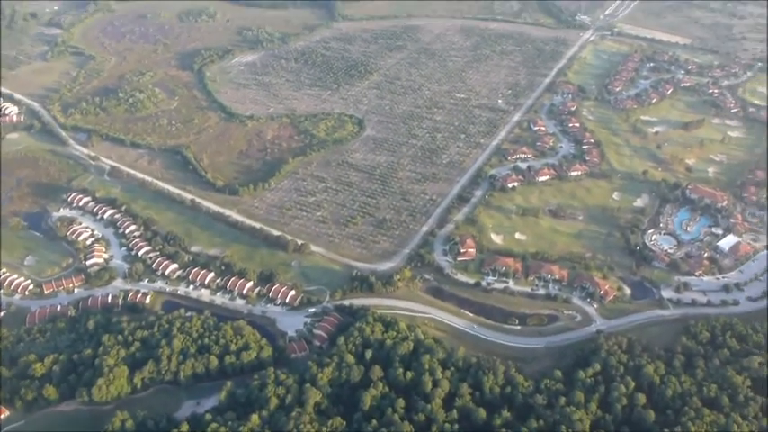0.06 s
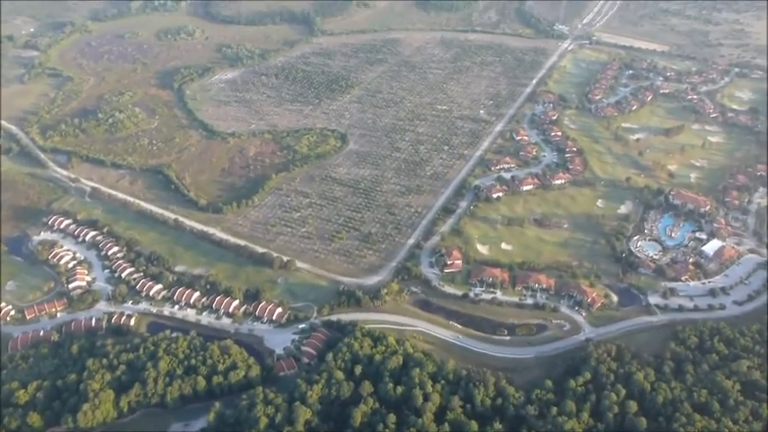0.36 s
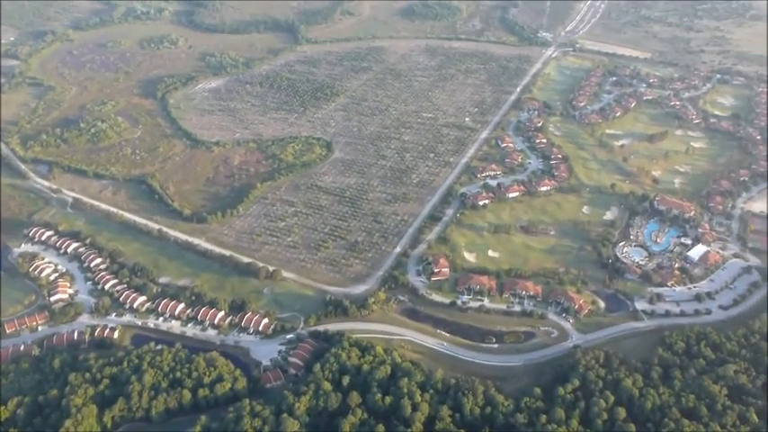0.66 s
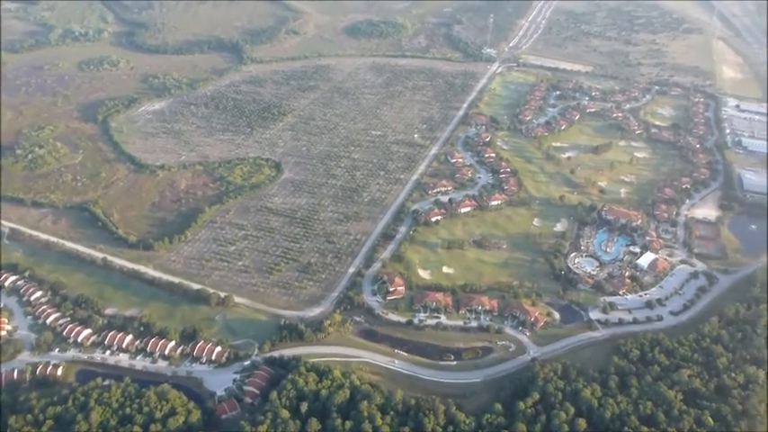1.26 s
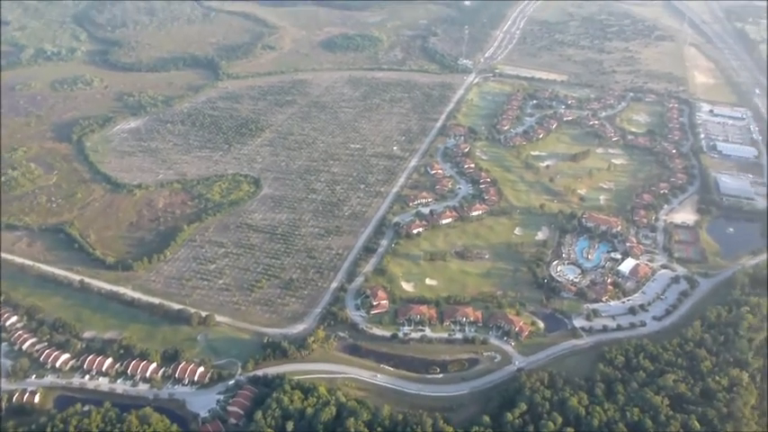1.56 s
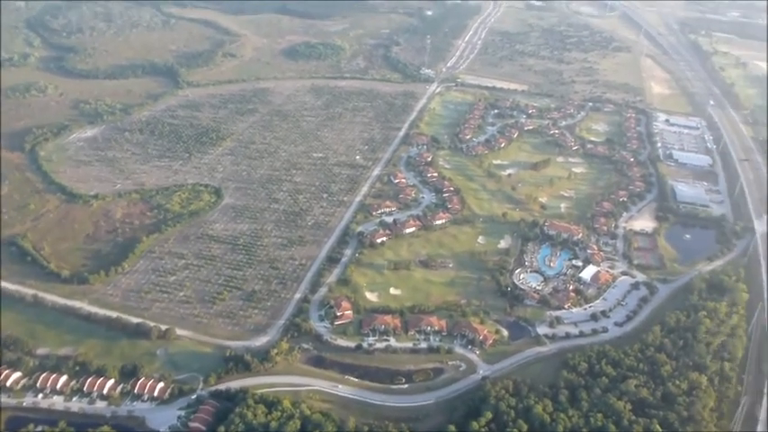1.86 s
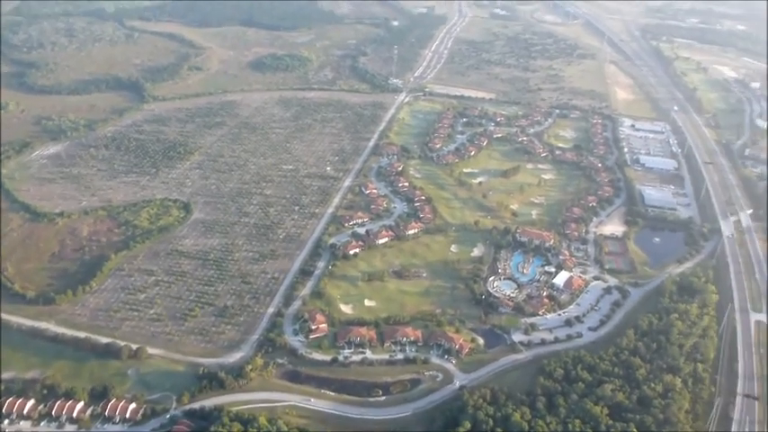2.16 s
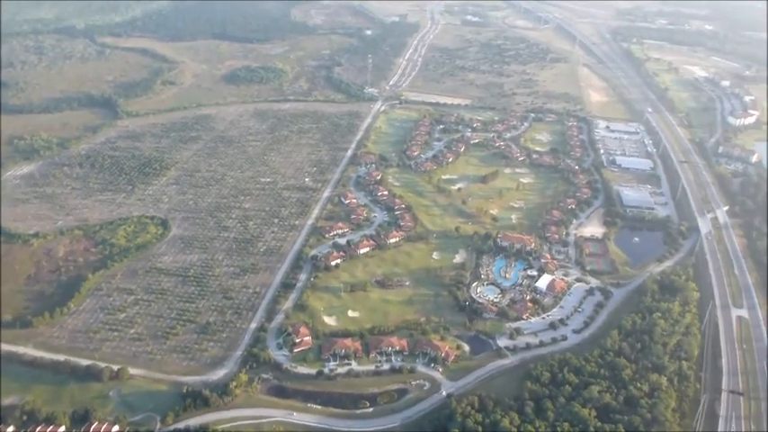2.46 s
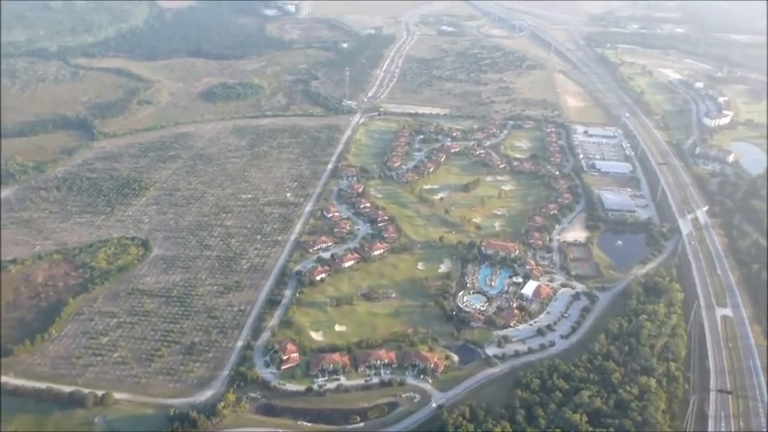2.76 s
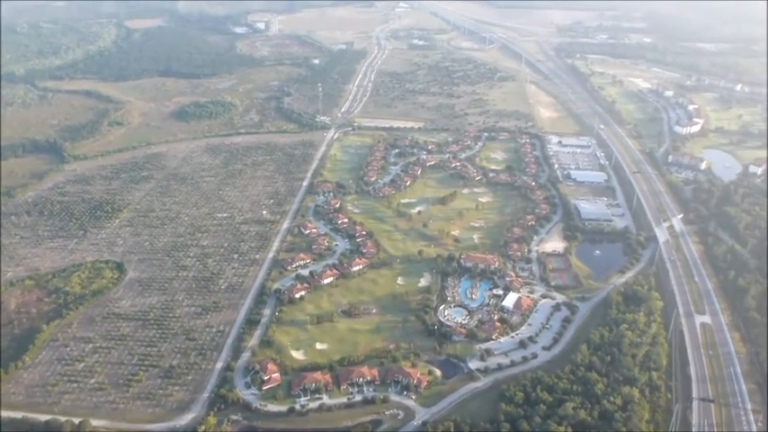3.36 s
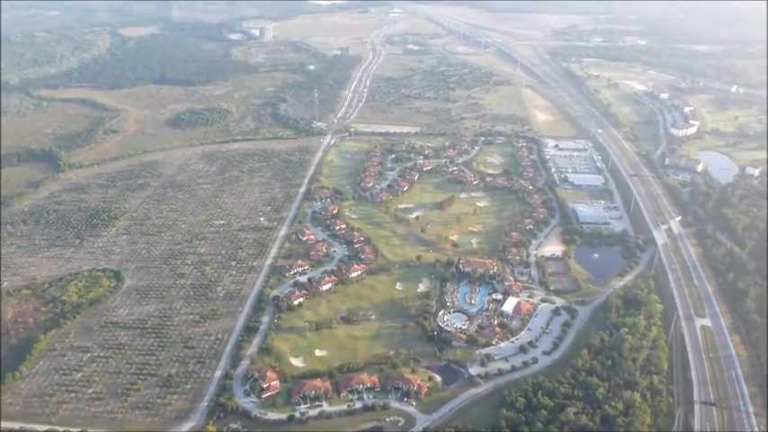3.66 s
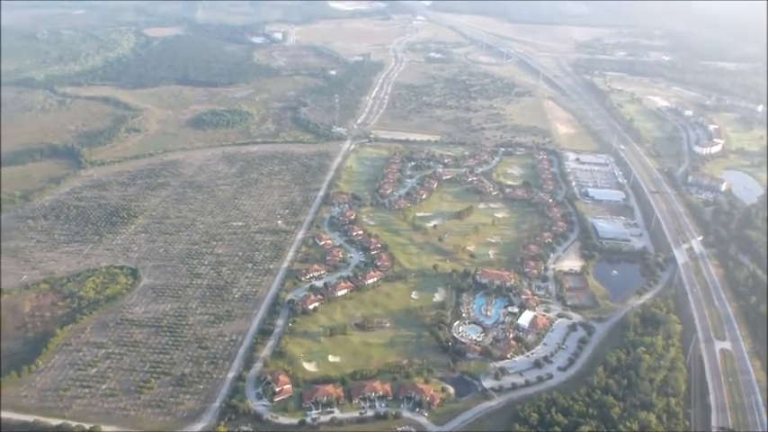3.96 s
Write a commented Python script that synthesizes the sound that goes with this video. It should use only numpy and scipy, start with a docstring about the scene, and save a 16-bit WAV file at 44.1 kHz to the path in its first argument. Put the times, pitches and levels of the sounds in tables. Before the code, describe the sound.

A hot air balloon burner roars and hisses, then shuts off to quiet open air.

```python
"""A propane burner roars just above a hot-air balloon basket, until its valve shuts.
Turbulent combustion rumbles and crackles over the hiss of the gas jets; roar and hiss dull as they
die away, and the last gas sighs out. The steady open-air background then grows louder as the
recorder's gain recovers. Faint whistles and a far hum come and go, small gusts buffet the
microphone and a hard fitting ticks in its damped modes."""
import sys
import numpy as np
from scipy import signal
from scipy.fft import rfft, irfft
from scipy.io import wavfile
from scipy.ndimage import uniform_filter1d

SR = 44100
rng = np.random.default_rng(int(sys.argv[2]) if len(sys.argv) > 2 else 0)


def inscribe(sig):
    """Save sig as 16-bit PCM at rate SR to the path in sys.argv[1].

    A 1-D sig is mono; a 2-D sig holds one channel per row.
    Samples are clipped to [-1, 1] before scaling.
    """
    pcm = np.round(np.clip(np.atleast_2d(sig).T, -1, 1) * 32767)
    wavfile.write(sys.argv[1], SR, pcm.astype(np.int16))


N = 176400

# strength of the burn with the valve open (time [s], flame level [dB], jet level [dB])
BURN_LEVEL = [(0, -19.5, -37), (.6, -20.5, -37), (.9, -19.5, -35.5), (1.18, -20, -36.5), (1.4, -19, -35.5),
              (1.9, -20, -35), (2.17, -20, -37.5), (2.24, -20.5, -40)]
# decay of the flame after the valve shuts (time [s], level [dB])
FLAME_DECAY = [(2.24, 0), (2.305, -1.5), (2.355, -8.5), (2.40, -18.5), (2.44, -39), (2.52, -60)]
# roar of the flame (frequency [Hz], spectral density [dB])
FLAME_SPECTRUM = [(10, -45), (22, -32), (36, -21), (50, -7.5), (80, -11.5), (105, -15), (125, -4),
                  (200, -4), (260, -1), (345, 0.5), (420, -3), (455, -5.5), (490, -4.5), (620, -12),
                  (710, -10.5), (1000, -18.5), (1350, -20), (1700, -22.5), (2200, -32.5), (3000, -50),
                  (6000, -73)]
# balance of the roar (frequency [Hz], left minus right [dB])
FLAME_PAN = [(100, -.5), (350, -1), (700, -2.5), (1400, -3.6), (2200, -7)]
# hiss at the two microphone ports
# (frequency [Hz], left density [dB], right density [dB], coherence [0-1], left phase lead [rad])
JET_SPECTRUM = [(2260, -9, -2, 0.57, -1.1), (3000, -7, 0.5, 0.73, -0.6), (3700, -7, -1, 0.75, -1.55),
                (4450, -7.5, 1, 0.6, -2.5), (5150, -10.5, 0.5, 0.3, -2.5), (5650, -13.5, 0.5, 0.58, -1.5),
                (6430, -7, 0, 0.56, -2.5), (7100, -15, 1, 0.1, -3.1), (7500, -9, -1, 0.53, -1.5),
                (8250, -8, -0.5, 0.39, -2.0), (8850, -10, 0.5, 0.49, -1.9), (9900, -6.5, -1.5, 0.7, -1.5),
                (11200, -2.5, -1.5, 0.7, -1.96), (12800, -2.5, -1, 0.68, -2.5), (14200, -1, -1, 0.73, -2.5),
                (15600, -7, -7, 0.7, -2.5)]
# decay of the hiss as the pressure falls (time [s], level [dB])
JET_DECAY = [(2.24, -0.5), (2.30, -2.5), (2.35, -10.5), (2.41, -22), (2.47, -31), (2.56, -53)]
# last gas leaving the nozzles (frequency [Hz], spectral density [dB])
SIGH_SPECTRUM = [(1500, -17), (2400, -7), (3100, -2), (4000, -2), (4800, 1), (5600, -6), (6600, -3),
                 (8000, -18), (9500, -10), (10500, -24.5), (15000, -34)]
# envelope of that sigh (time [s], level [dB])
SIGH_ENVELOPE = [(2.2, -80), (2.29, -47), (2.35, -47), (2.41, -49), (2.46, -62), (2.52, -73), (2.65, -95)]
# rumble of stirred air (frequency [Hz], spectral density [dB])
DRAUGHT_SPECTRUM = [(10, -10), (35, 0), (70, -3), (150, -14), (400, -35), (1500, -80)]
# gusts at the microphone (time [s], level [dB], frequency [Hz], left minus right [dB])
GUSTS = [(2.616, -36.5, 135, 7), (3.237, -39.5, 95, -10), (3.669, -27, 124, -6), (3.743, -28.5, 120, -7),
         (3.847, -34, 180, -10), (3.859, -29.5, 106, -9), (3.894, -34, 170, 13), (3.909, -31, 120, -1),
         (3.930, -32, 110, -12), (3.951, -30.5, 150, 6)]
# knocks on the fitting (time [s], level [dB])
KNOCKS = [(2.783, -60), (3.8823, -37.5)]
# modes of the fitting (frequency [Hz], level [dB], time to decay by 60 dB [s])
FITTING_MODES = [(1520, 2, 0.0068), (2300, -1, .005), (3400, -3, .003), (4280, -1.5, .011),
                 (5600, -12, .006), (6760, -13, .008), (9400, -13, .004)]
# open air and the land far below (frequency [Hz], spectral density [dB])
AIR_SPECTRUM = [(10, -41), (25, -20), (60, -4), (130, -4), (240, -5), (280, -6.5), (318, -7.5), (345, -6),
                (375, -6), (500, -14), (800, -15.5), (1300, -23.5), (2200, -32.5), (3000, -34), (4000, -39),
                (7000, -44), (11000, -46.5), (14000, -51), (15800, -59)]
# likeness of that air at the two ports (frequency [Hz], correlation [-1 to 1])
AIR_CORRELATION = [(30, 0.22), (150, 0.93), (400, 0.98), (900, 0.97), (1500, 0.69), (2200, 0.38), (3500, 0),
                   (5000, -0.37), (12000, -0.033)]
# the background as the recorder's gain recovers (time [s], body level [dB], treble level [dB])
AIR_GAIN_RECOVERY = [(2.5, -51, -48), (2.88, -50, -47.5), (3.1, -47, -49), (3.3, -46.5, -47),
                     (3.55, -44, -44), (3.75, -43.5, -44), (3.9, -42.5, -42), (4.0, -42, -44)]
# breathy whistles and a far hum
# (start [s], end [s], frequency [Hz], half-width [Hz], level [dB], left minus right [dB])
WHISTLE_BANDS = [(2.5, 3.17, 2590, 150, -72, 2), (2.665, 2.71, 4880, 260, -76, -9),
                 (2.77, 2.96, 4900, 250, -85, -6), (3.02, 3.52, 320.5, 10, -51, -3),
                 (3.722, 4.0, 2620, 170, -73, 0), (3.74, 3.87, 10300, 800, -76, -3)]

PAN = np.array([[.5], [-.5]])  # shares a level difference between left and right


def flame(gain_db=.14, flutter_db=.44, dulling_per_octave=.3):
    """Turbulent combustion: unsteady heat release radiates a roar that dulls as it goes out."""
    t, hz = grid(size=1024)
    decay_db, = curve(FLAME_DECAY, t)
    octaves = np.log2(np.maximum(hz / 350, 1))
    level = curve(BURN_LEVEL, t)[0] + gain_db + decay_db * (1 + dulling_per_octave * octaves)
    level += flutter_db * wander(t.shape, size=(6, 1))
    level += wander(level.shape, size=(8, 9))  # patches of 1 dB rms in time and frequency
    colour_db = spectrum(FLAME_SPECTRUM, hz)[0] + PAN * spectrum(FLAME_PAN, hz)[0]
    return noise(colour_db, level, coherence=.99)


def crackle(pops_per_s=500, gain_db=-19.5, spread_db=1.5, band_hz=(506, 1860)):
    """Shot noise: pockets of gas pop in the flame as dense, independent impulses."""
    t = np.arange(N) / SR
    onsets = rng.random(N) < pops_per_s / SR
    sizes = amp(spread_db * np.minimum(rng.exponential(1, N), 4))
    pops = unit(bandpass(onsets * sizes, band_hz, order=3))
    level = gain_db + curve(BURN_LEVEL, t)[0] + 1.5 * curve(FLAME_DECAY, t)[0]
    return pops * amp(level - 3.2 * PAN)


def jets(gain_db=6, low_cut_hz=1860, flutter_db=.54, patchy_db=.5, dulling_per_octave=.2054):
    """Jet noise: gas hisses by turbulent mixing and loses its treble as the pressure falls."""
    t, hz = grid(size=512)
    left_db, right_db, coherence, phase = spectrum(JET_SPECTRUM, hz)
    low_cut_db = -10 * np.log10(1 + (low_cut_hz / (hz + 1)) ** 6)
    decay_db, = curve(JET_DECAY, t)
    octaves = np.log2(np.maximum(hz, 3000) / 6000)
    level = curve(BURN_LEVEL, t)[1] + gain_db + decay_db * (1 + dulling_per_octave * octaves)
    level += flutter_db * wander(t.shape, size=(20, 1))
    level += patchy_db * wander(level.shape, size=(40, 14))
    return noise(np.array([left_db, right_db]) + low_cut_db, level, coherence, phase)


def sigh(pan_db=-4.5):
    """Jet noise at low pressure: with the valve shut, the last gas makes a softer, lower rush."""
    t, hz = grid(size=512)
    colour_db = spectrum(SIGH_SPECTRUM, hz)[0] + pan_db * PAN
    level = curve(SIGH_ENVELOPE, t)[0] + np.zeros_like(hz)
    return noise(colour_db, level, coherence=.4, phase=spectrum(JET_SPECTRUM, hz)[3])


def draught(gain_db=-54):
    """Local pressure fluctuations: air stirred by the flame rumbles independently at each port."""
    t, hz = grid(size=2048)
    level = gain_db + curve(FLAME_DECAY, t)[0] + np.zeros_like(hz)
    return noise(spectrum(DRAUGHT_SPECTRUM, hz)[0], level, coherence=0)


def buffets(width_cycles=.48, wake_s=.018, wake_db=-15, wake_hz=(60, 370)):
    """Wind noise: each eddy pushes and pulls the diaphragm once, amid ragged turbulence."""
    out = np.zeros((2, N))
    wake = unit(bandpass(rng.standard_normal((2, N)), wake_hz, order=2))
    for centre, db, hz, pan_db in GUSTS:
        t = np.arange(N) / SR - centre
        envelope = np.exp(-.5 * (t * hz / width_cycles) ** 2)
        push = envelope * np.cos(2 * np.pi * t * hz + np.pi / 4)
        ragged = wake * amp(wake_db) * np.exp(-abs(t) / wake_s)
        out += (push + ragged) * amp(db + pan_db * PAN)
    return out


def ticks(pan_db=-3):
    """Free vibration: each light knock rings the damped modes of a small hard fitting."""
    out = np.zeros(N)
    for start, knock_db in KNOCKS:
        t = np.maximum(np.arange(N) / SR - start, 0)
        for k, (hz, db, t60) in enumerate(FITTING_MODES):
            out += (-1) ** k * amp(knock_db + db - 60 * t / t60) * np.sin(2 * np.pi * hz * t)
    return out * amp(pan_db * PAN)


def air(crossover_hz=2500):
    """Gain recovery: steady ambient noise grows louder along a set curve after the burner stops."""
    t, hz = grid(size=2048)
    body_db, treble_db = curve(AIR_GAIN_RECOVERY, t)
    treble_share = hz ** 2 / (hz ** 2 + crossover_hz ** 2)
    level = body_db + (treble_db - body_db) * treble_share
    level += wander(level.shape, size=(8, 12))  # patches of 1 dB rms
    return noise(spectrum(AIR_SPECTRUM, hz)[0], level, spectrum(AIR_CORRELATION, hz)[0])


def whistles(fade_s=.03, coherence=.9, waver_db=2):
    """Narrow-band noise is heard as pitch: faint, unsteady whistles and a hum fade in and out."""
    t, hz = np.arange(N) / SR, np.fft.rfftfreq(N, 1 / SR)
    out = np.zeros((2, N))
    for start, end, pitch, width, db, pan_db in WHISTLE_BANDS:
        passband = np.exp(-((hz - pitch) / width) ** 2)
        bands = irfft(rfft(rng.standard_normal((3, N))) * passband, N)  # shared, left, right
        tone = unit(np.sqrt(coherence) * bands[0] + np.sqrt(1 - coherence) * bands[1:])
        gate = np.clip(np.minimum(t - start, end - t) / fade_s + .5, 0, 1)
        waver = uniform_filter1d(uniform_filter1d(rng.standard_normal(N), size=1500), size=1500)
        out += tone * gate * amp(db + waver_db * unit(waver) + pan_db * PAN)
    return out


def amp(db):
    """Amplitude ratio of a level in decibels."""
    return 10 ** (np.asarray(db) / 20)


def unit(x):
    """Normalisation to rms 1."""
    return x / np.sqrt(np.mean(x ** 2) + 1e-20)


def bandpass(x, band_hz, order):
    """Maximally flat band-pass filtering."""
    return signal.sosfilt(signal.butter(order, band_hz, "bandpass", fs=SR, output="sos"), x)


def curve(table, t):
    """Linear interpolation of each column at the times t."""
    times, *columns = np.transpose(table)
    return [np.interp(t, times, c) for c in columns]


def spectrum(table, hz):
    """Interpolation of each column on a log-frequency axis."""
    frequencies, *columns = np.transpose(table)
    return [np.interp(np.log(hz + 1), np.log(frequencies + 1), c) for c in columns]


def grid(size):
    """Frame times (a column) and bin frequencies (a row) of short-time spectra."""
    return np.arange(4 * N // size + 5)[:, None] * size / 4 / SR, np.fft.rfftfreq(size, 1 / SR)


def wander(shape, size):
    """Random modulation of rms 1, smoothed over size = (frames, bins)."""
    window = np.outer(*[np.hanning(k + 2) for k in size])
    return unit(signal.fftconvolve(rng.standard_normal(shape), window, "same"))


def noise(colour_db, level_db, coherence, phase=0):
    """Spectral synthesis: partly coherent stereo noise, of rms 1 before level_db shapes it."""
    frames, bins = level_db.shape
    size, coherence = 2 * (bins - 1), np.clip(coherence, -1, 1)
    a, b, c, d = rng.standard_normal((4, frames, bins))
    right = a + 1j * b
    left = (coherence * right + np.sqrt(1 - coherence ** 2) * (c + 1j * d)) * np.exp(1j * phase)
    coloured = np.array([left, right]) * amp(colour_db).reshape(-1, 1, bins)
    framing = dict(nperseg=size, noverlap=size - size // 4, time_axis=1, freq_axis=2)
    plain = signal.istft(coloured, **framing)[1][:, :N]
    shaped = signal.istft(coloured * amp(level_db), **framing)[1][:, :N]
    return shaped / plain.std()


def scene():
    """Superposition of the burner overhead and the open air around the basket."""
    return flame() + crackle() + jets() + sigh() + draught() + air() + whistles() + buffets() + ticks()


def record(dry):
    """Frequency response of the microphone: a bass roll-off, then the upper band limit."""
    low_cut = signal.butter(N=2, Wn=34, btype="highpass", fs=SR, output="sos")
    band_limit = signal.firwin(1023, cutoff=15800, window=("kaiser", 9), fs=SR)
    return signal.oaconvolve(signal.sosfilt(low_cut, dry), band_limit[None], "same")


dry = scene()
out = record(dry)
inscribe(out)
```